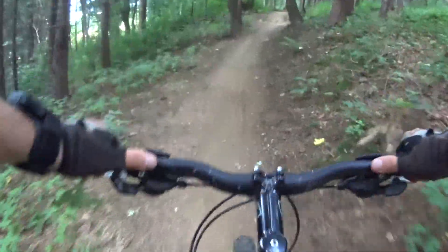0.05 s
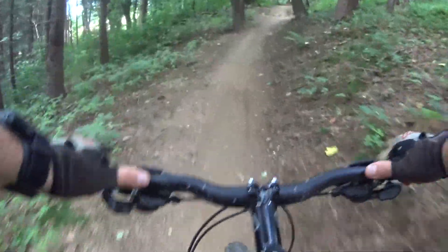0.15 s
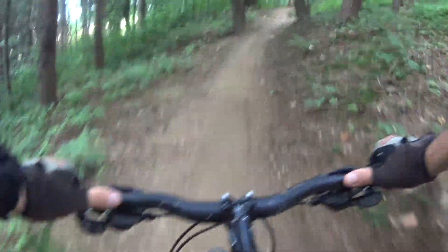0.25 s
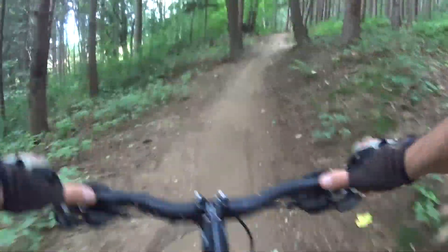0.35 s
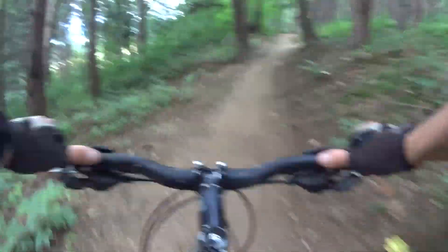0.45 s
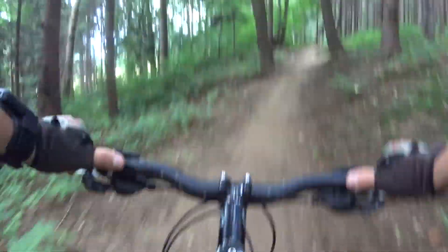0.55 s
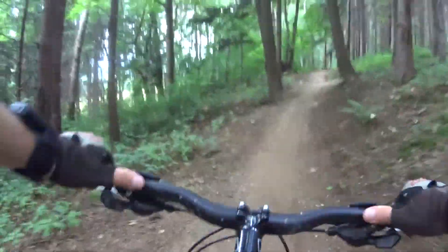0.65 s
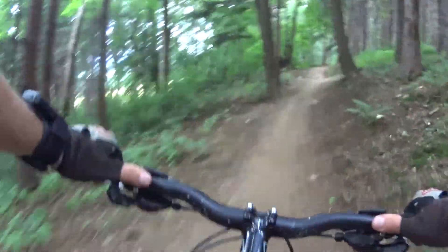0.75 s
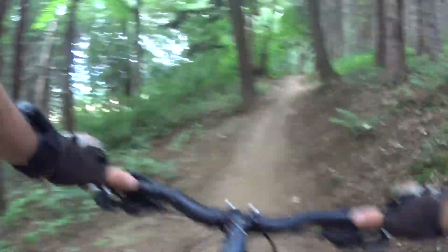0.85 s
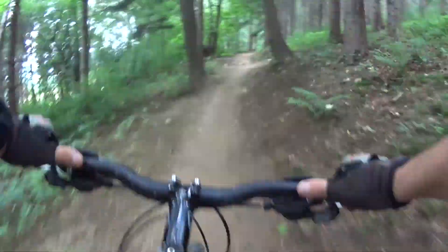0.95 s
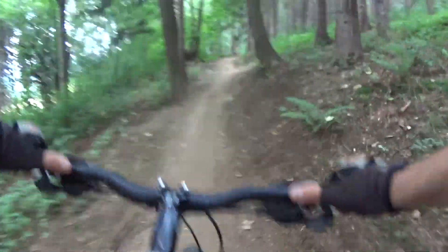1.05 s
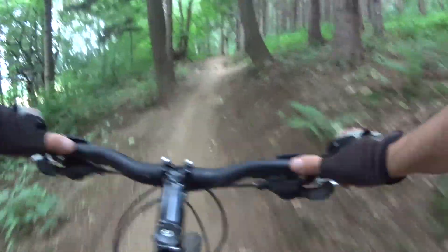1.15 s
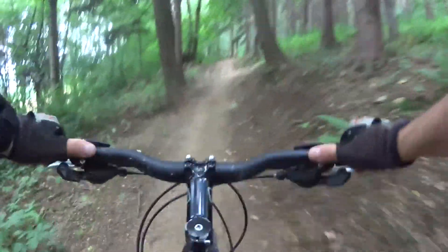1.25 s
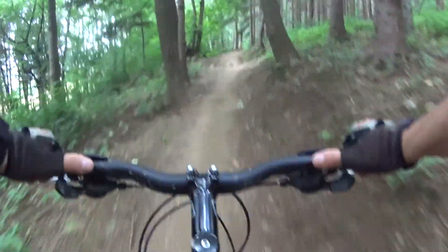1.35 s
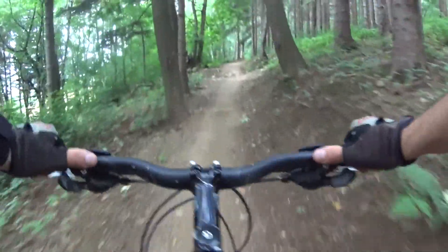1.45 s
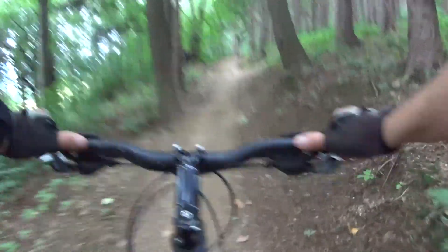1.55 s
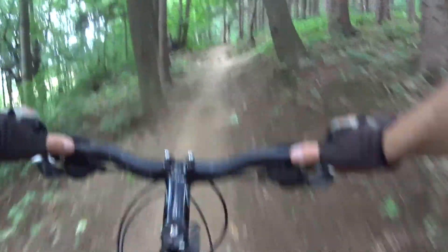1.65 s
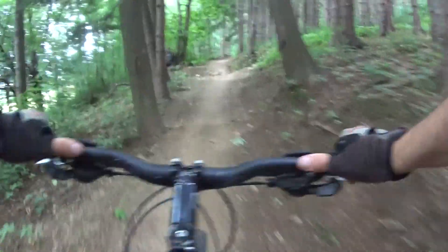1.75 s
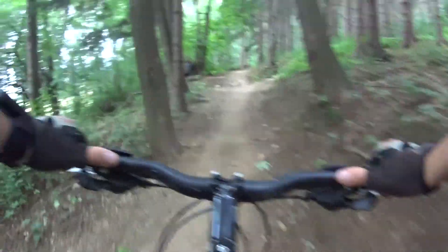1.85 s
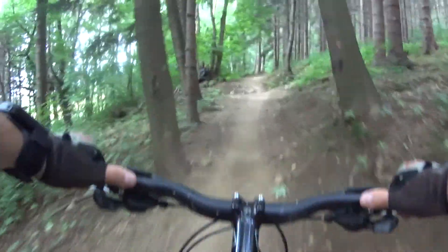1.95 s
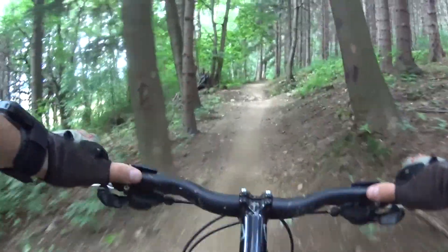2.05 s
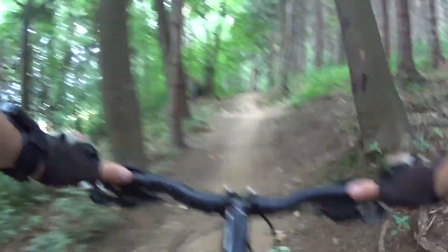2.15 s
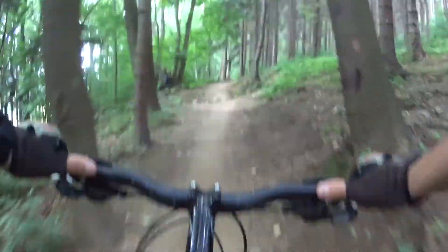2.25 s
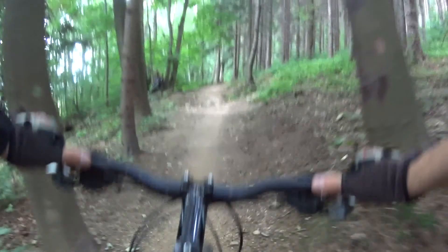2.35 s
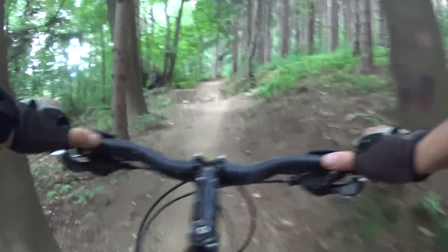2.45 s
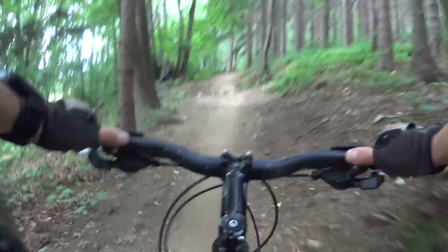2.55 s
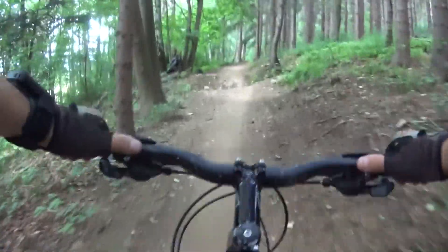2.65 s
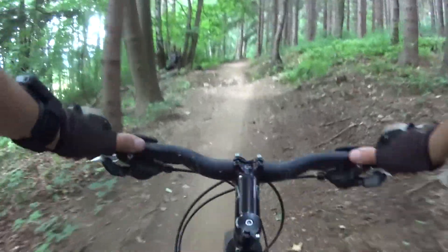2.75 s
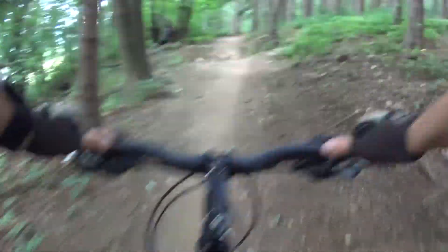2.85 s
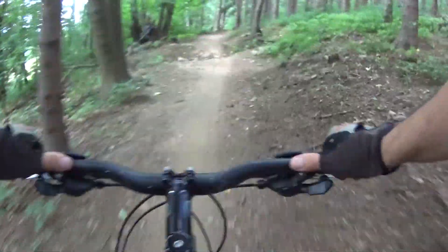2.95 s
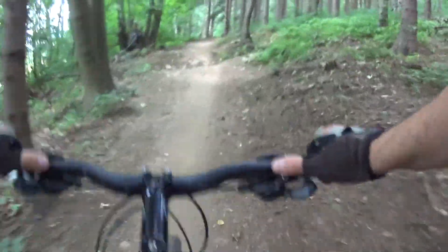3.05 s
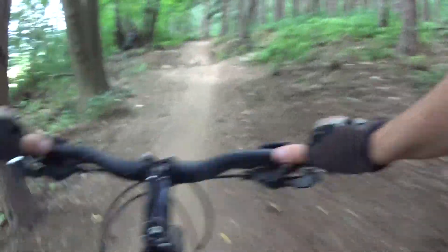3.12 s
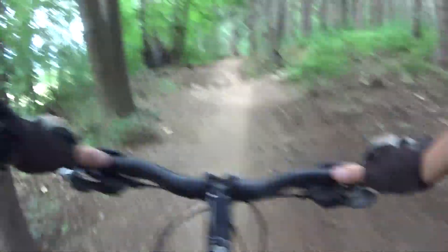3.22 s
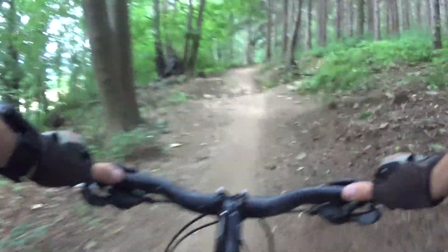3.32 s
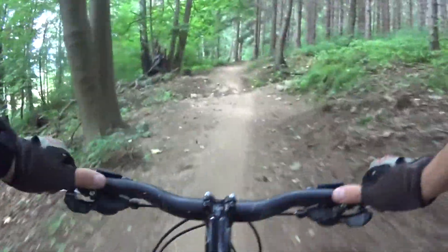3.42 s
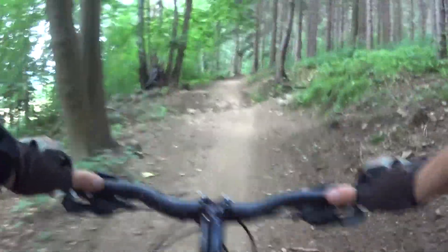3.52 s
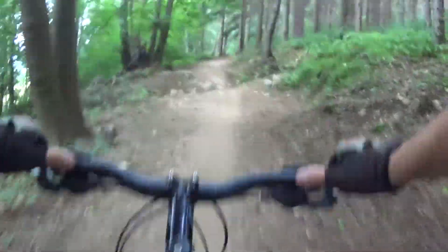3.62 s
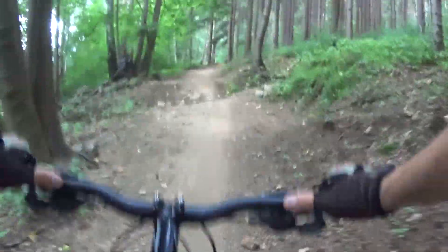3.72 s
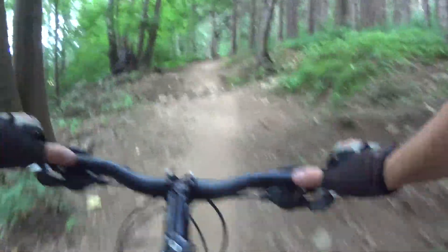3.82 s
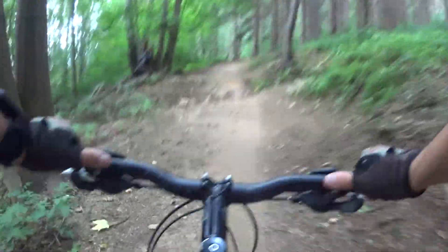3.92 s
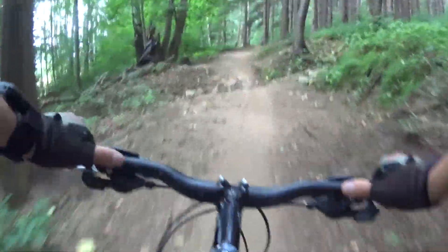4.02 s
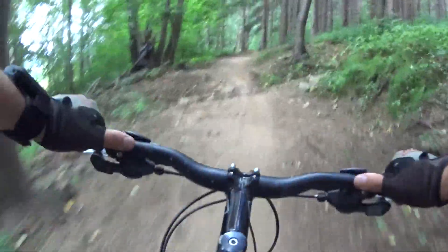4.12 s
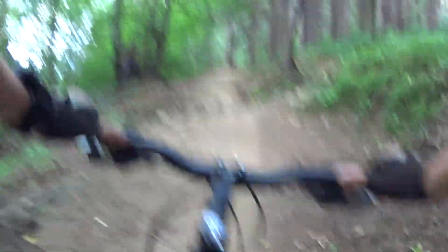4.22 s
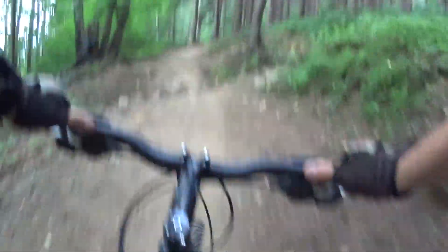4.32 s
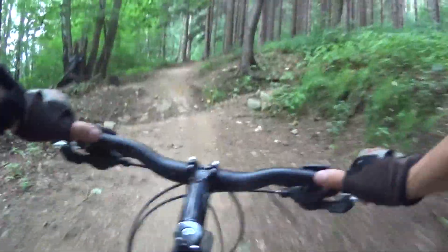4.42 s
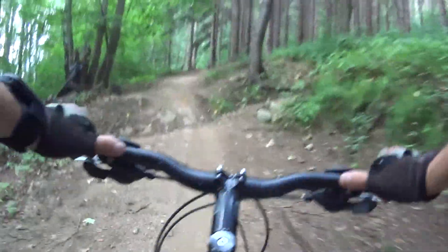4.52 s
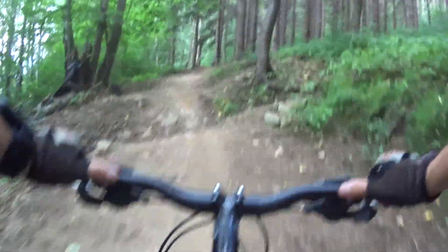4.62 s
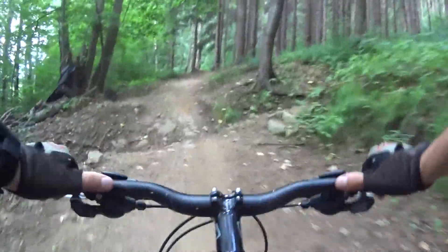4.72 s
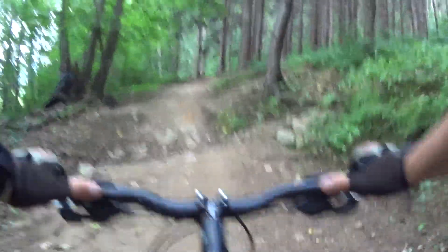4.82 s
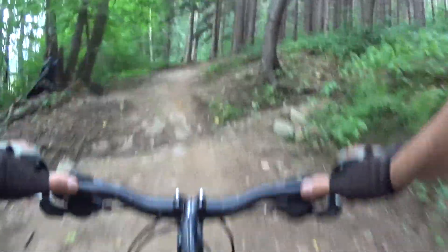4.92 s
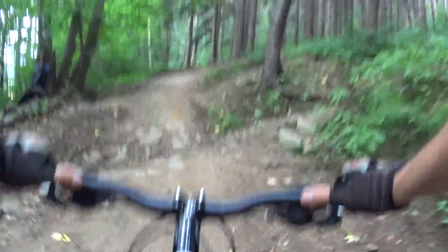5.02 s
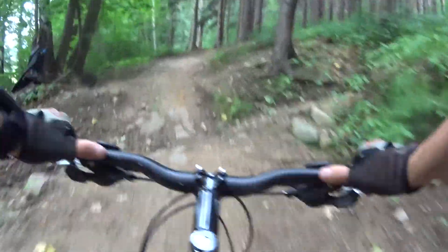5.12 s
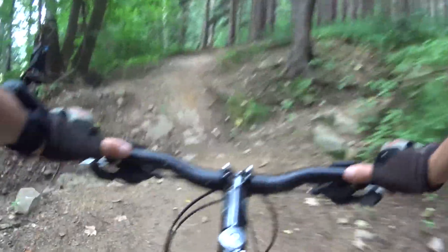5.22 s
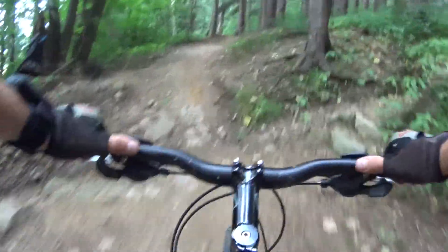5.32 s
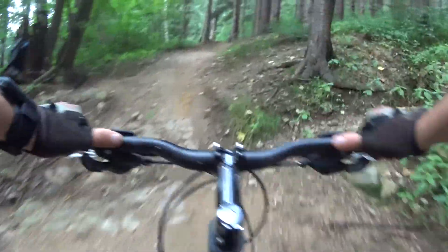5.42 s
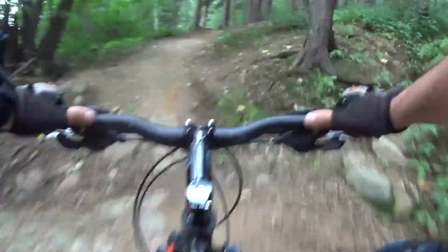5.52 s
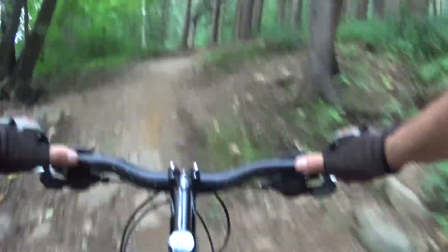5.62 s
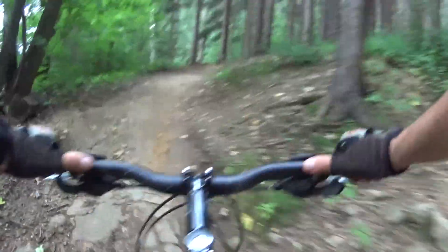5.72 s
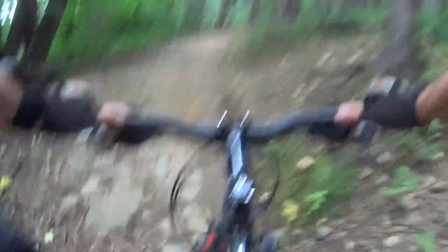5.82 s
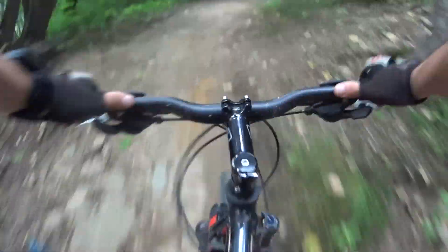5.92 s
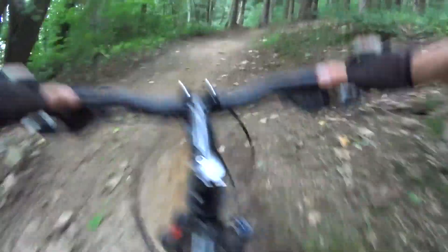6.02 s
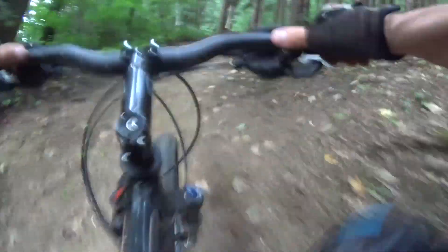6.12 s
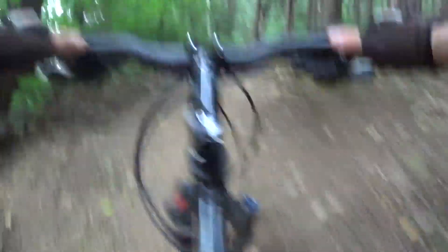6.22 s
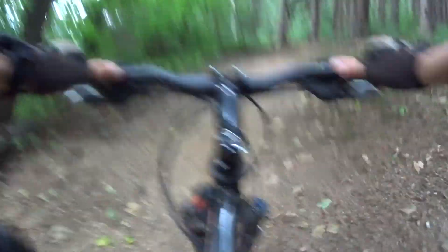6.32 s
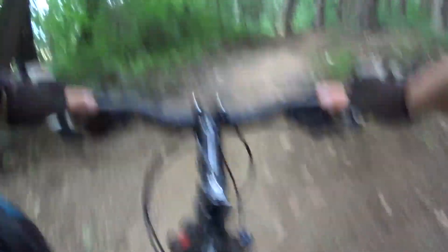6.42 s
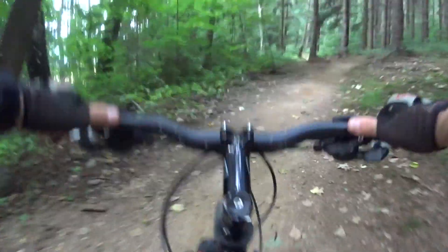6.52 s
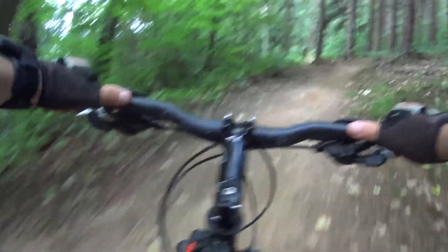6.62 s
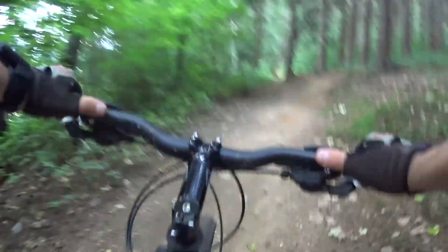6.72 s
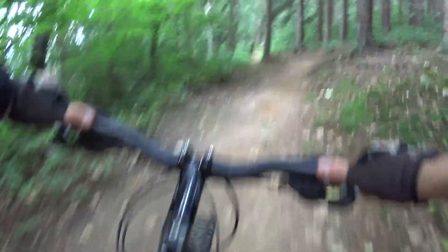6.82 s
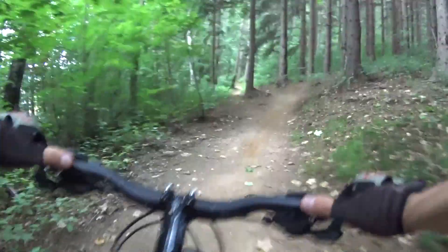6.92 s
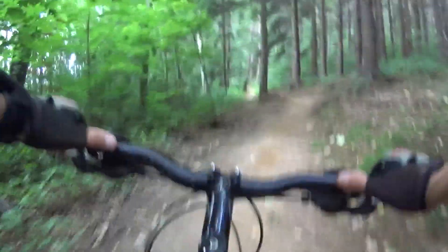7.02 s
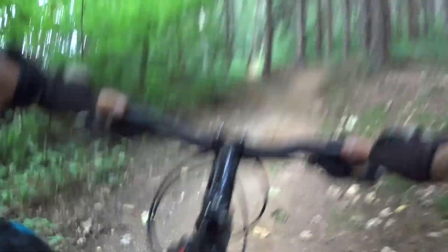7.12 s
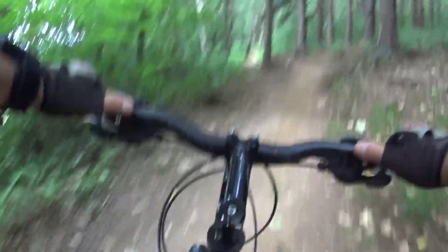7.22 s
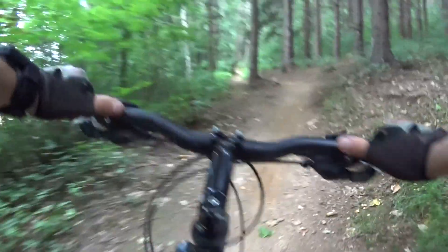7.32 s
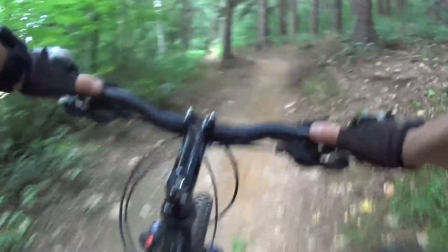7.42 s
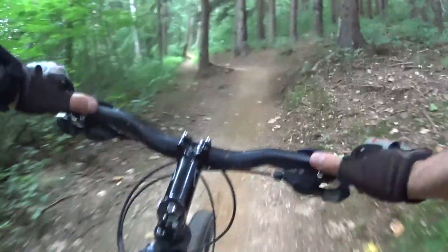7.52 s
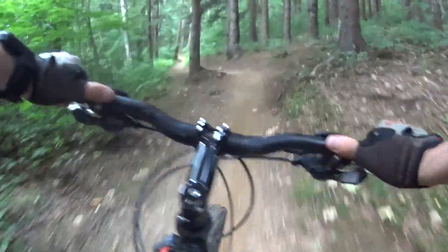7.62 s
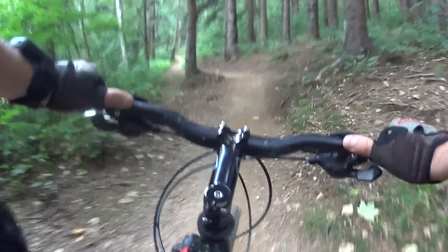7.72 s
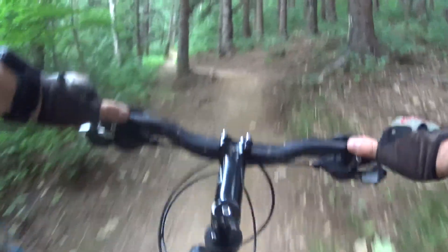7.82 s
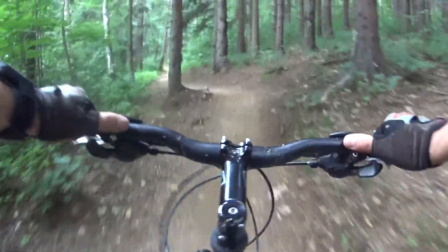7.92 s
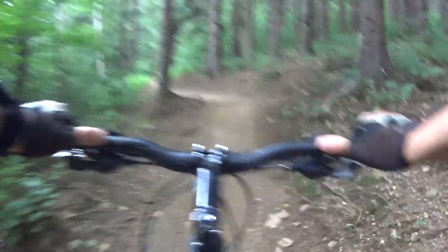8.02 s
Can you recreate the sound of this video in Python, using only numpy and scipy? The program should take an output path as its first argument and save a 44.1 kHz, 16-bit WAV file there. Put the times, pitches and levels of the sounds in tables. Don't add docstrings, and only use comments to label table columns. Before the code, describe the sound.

Close, boxy rattle of a bike on rough dirt: gritty tyre crackle, sharp frame slaps and case knocks, peaking in a hard clattering impact over rocks.

```python
import sys
import numpy as np
from scipy import signal
from scipy.fft import rfft, irfft, next_fast_len
from scipy.io import wavfile
from scipy.ndimage import uniform_filter1d, minimum_filter1d, map_coordinates

SR = 44100
rng = np.random.default_rng(int(sys.argv[2]) if len(sys.argv) > 2 else 0)


def attenuation_scalar(level_db):
    decades = np.asarray(level_db, float) / 20
    return 10 ** decades


def generate_wav(signal):
    frames = np.transpose(np.atleast_2d(signal))
    scaled = np.clip(frames, -1, 1) * 32767
    pcm = np.round(scaled).astype(np.int16)
    wavfile.write(sys.argv[1], SR, pcm)


N = 355446

# (frequency [Hz], density [dB per Hz])
GRIT_COLOUR = [(530, -41.5), (900, -9.5), (1160, -26), (1260, -3.5), (2020, 0), (2240, 2.5), (3640, -10.5),
               (6000, -19), (7800, -47), (13200, -120)]
# (frequency [Hz], density [dB per Hz])
HISS_COLOUR = [(1760, -39), (3000, 2.5), (3680, -3), (4700, 3.5), (6040, -4), (7540, -14.5), (8420, -9),
               (9890, -16), (10600, -10), (11300, -17), (14700, -60), (22000, -120)]
# (frequency [Hz], density [dB per Hz])
CASE_COLOUR = [(88, -28.5), (150, -1.5), (309, 5.5), (520, 8), (693, 7), (812, 5), (1230, 6.5), (1900, -4),
               (2470, -28), (4180, -120)]


def along(points, hz):
    f, v = np.transpose(points)
    return np.interp(np.log(hz + 1), np.log(f + 1), v)


def unit(x):
    return x / np.sqrt(np.mean(x ** 2) + 1e-20)


def wobble(rate):
    knots = rng.standard_normal(int(N * rate / SR) + 4)
    return map_coordinates(knots, [np.arange(N) * rate / SR])


def filtered(x, response):
    m = next_fast_len(N + 8192)
    return irfft(rfft(x, m) * response(np.fft.rfftfreq(m, 1 / SR)), m)[..., :N]


def causal(spectrum, hz):
    grid_hz = np.linspace(0, SR / 2, num=8193)
    cepstrum = irfft(np.log(attenuation_scalar(along(spectrum, grid_hz))))
    half = np.arange(len(cepstrum)) < len(grid_hz)
    return np.exp(np.interp(hz, grid_hz, rfft(cepstrum * half * 2) - cepstrum[0]))


def place(times_s, shapes):
    starts = np.round(times_s.ravel() * SR).astype(int)
    at = (starts[:, None] + np.arange(shapes.shape[2])).ravel()
    return np.array([np.bincount(at, shapes[:, c].ravel(), N + SR)[:N] for c in (0, 1)])


def grains(spectrum, per_s, clump_db, smooth):
    # (frequency [Hz], left-right likeness [0-1])
    likeness = [(60, 1), (220, 1), (600, 0.92), (1200, 0.79), (3160, .93), (11800, 0.57)]

    def stream():
        hits = rng.random(N) < per_s / SR * attenuation_scalar(clump_db * wobble(40))
        sizes = np.tanh(rng.standard_normal(N) ** 3 / 8)
        return unit(hits * sizes) + smooth * rng.standard_normal(N)

    def mid_side(hz):
        turn = np.arccos(np.clip(along(likeness, hz), -1, 1)) / 2
        return causal(spectrum, hz) * [np.cos(turn), np.sin(turn)]

    mid, side = filtered(np.array([stream(), stream()]), mid_side)
    return unit(np.array([mid + side, mid - side]))


def pebbles(bumps, count):
    luck = rng.random((4, count, 1, 1))
    odds = np.cumsum(attenuation_scalar(2.5 * bumps))
    s = np.searchsorted(odds, luck[0].ravel() * odds[-1]) / SR
    hz = 2350 * np.exp(0.292 * rng.standard_normal((count, 1, 1)))
    t = np.arange(SR // 160) / SR
    t60_s = 0.003 + 0.015 * luck[2]
    size = attenuation_scalar(-4.5 * np.log(luck[1] + 0.028) - 60 * t / t60_s)
    spread_rad = 1.7 * (luck[3] - 0.5) * [[1], [-1]]
    return unit(place(s, size * np.sin(2 * np.pi * hz * t + spread_rad)))


def rolling():
    # (time [s], loose dirt under the tyres [dB], bumpiness of the ground [dB])
    ride = [(0.0, -36, -51), (0.13, -32, -53), (0.27, -27.5, -39.5), (0.69, -37, -46), (1.48, -32.5, -39.5),
            (1.91, -31.5, -49), (2.11, -35, -46), (2.99, -36, -41), (3.21, -39.5, -40),
            (4.29, -35.5, -43.5), (4.76, -36, -44.5), (5.25, -32, -50.5), (5.75, -28, -44),
            (5.88, -21.5, -22.5), (6.33, -33.5, -29), (6.62, -33, -37), (7.52, -34.5, -44.5),
            (8.06, -31.5, -43.5)]
    # (frequency [Hz], density [dB per Hz])
    buffet_colour = [(8.8, -55), (15, 7.5), (133, 0), (216, -6.5), (400, -7.5), (520, -81), (880, -120)]
    s, *cols = np.transpose(ride)
    loose_db, bumpy_db = (np.interp(np.arange(N) / SR, s, c) for c in cols)
    grit_db = loose_db - 2.5
    hiss_db = -39 + 0.76 * (loose_db - loose_db.mean())
    swing_db = bumpy_db - bumpy_db.mean()
    buffet_db, shake_db = -39 + 0.6 * swing_db, -41 + 0.74 * swing_db

    bumps = wobble(22)
    grit = attenuation_scalar(grit_db + 2.5 + 0.6 * bumps) * grains(GRIT_COLOUR, per_s=800, clump_db=4, smooth=0.6)
    stones = attenuation_scalar(grit_db - 4.0) * pebbles(bumps, count=2200)
    hiss_gain = attenuation_scalar(hiss_db + 1.4 * bumps + 0.28 * wobble(29))
    hiss = hiss_gain * grains(HISS_COLOUR, per_s=890, clump_db=8.5, smooth=1.0)
    gusts = attenuation_scalar(2.5 * wobble(18))
    buffet = attenuation_scalar(buffet_db + 1.0) * gusts * grains(buffet_colour, per_s=190, clump_db=3, smooth=0.8)
    lumps = attenuation_scalar(2.6 * wobble(35))
    shake = lumps * attenuation_scalar(shake_db) * grains(CASE_COLOUR, per_s=350, clump_db=4.5, smooth=1.0)
    return grit + stones + hiss + buffet + shake


def slaps(rows):
    s, db, hz, bright_db = np.transpose(rows)[:, :, None, None]
    t = np.arange(SR // 30) / SR
    luck = rng.random((len(s), 4, 1))

    def ping(u):
        envelope = (u > 0) * attenuation_scalar(-60 * u / 0.0044) * (1 - np.exp(-np.abs(u) / 0.00035))
        return envelope * np.sin(2 * np.pi * hz * u + 0.8 * luck[:, :2])

    bounce_s = 0.0015 + 0.00334 * luck[:, 3:]
    ring = ping(t) + attenuation_scalar(-13.0 - 6.0 * luck[:, 2:3]) * ping(t - bounce_s)
    shared = rng.standard_normal((len(s), 1, len(t)))
    noise = shared + 0.5 * rng.standard_normal((len(s), 2, len(t)))
    tail = place(s, attenuation_scalar(db + 1 - 60 * t / 0.028) * noise)
    tick_decay = attenuation_scalar(8 - 60 * t / 0.005) + attenuation_scalar(-60 * t / 0.05)
    tick = place(s, attenuation_scalar(db + bright_db + 6.5) * tick_decay * noise)
    gritty = filtered(tail, lambda f: attenuation_scalar(along(GRIT_COLOUR, f)))
    bright = filtered(tick, lambda f: attenuation_scalar(0.82 * along(HISS_COLOUR, f)) * (f > 3500))
    return place(s, attenuation_scalar(db + 6.5) * ring) + gritty + bright


def chain():
    # (time [s], peak [dB], ring [Hz])
    chain_slaps = [(.036, -6.5, 1800), (0.126, -8, 2570), (0.135, -11, 2460), (0.2082, -6, 2800),
                   (1.0114, -5.5, 2380), (1.6099, -14, 2520), (1.6933, -3, 2200), (1.8075, -4.5, 2840),
                   (1.971, -11, 2400), (2.093, -3, 2130), (2.3432, -4.5, 2400), (2.3844, -7, 3540),
                   (2.7178, -12.5, 3440), (2.813, -7, 2240), (3.768, -14, 3970), (3.843, -11.5, 3170),
                   (4.1, -7, 2100), (4.124, -7, 2200), (4.135, -10, 2970), (4.4915, -5, 2450),
                   (4.6507, -10, 2480), (4.738, -12, 2270), (5.349, -1.5, 2980), (5.5037, -3.5, 2140),
                   (5.5982, -2.5, 2410), (5.959, 3.5, 1910), (6.137, 1.5, 1940), (6.3925, -9, 2080),
                   (7.202, -1, 2130)]
    # (time [s], peak [dB])
    chain_ticks = [(0.0512, -12), (0.261, -9), (.277, -13), (.419, -6), (0.224, -2), (0.9147, -13.5),
                   (1.963, -12), (2.6226, -15.5), (2.7954, -9), (2.867, -15.5), (3.112, -8), (3.13, -22),
                   (4.297, -19), (4.3714, -13), (4.474, -14), (4.5267, -16), (4.721, -15), (4.9577, -11),
                   (5.125, -14), (5.187, -18), (5.4248, -11), (5.66, -24), (6.8503, -16)]
    bright_db, tick_hz = -27, 2450
    rows = [(*r, bright_db) for r in chain_slaps]
    return slaps(rows + [(*r, tick_hz, bright_db) for r in chain_ticks])


def cables():
    # (time [s], peak [dB], ring [Hz])
    cable_slaps = [(0.1712, -5.5, 2680), (0.248, -8, 2130), (0.289, -5, 2310), (0.315, -6, 2400),
                   (0.341, -6.5, 2310), (0.359, -8, 2260), (0.394, -13, 2250), (.406, 0, 2100),
                   (0.4448, -4, 2400), (1.427, -9, 2430), (1.4378, -4, 2460), (1.4768, -12, 2780),
                   (1.485, -7, 1870), (3.489, -14.5, 2100), (3.653, -9, 1980), (3.698, -12, 2000),
                   (3.679, -2.5, 2000), (4.7676, -1, 2620), (5.098, 0.5, 2480), (5.6436, -4, 2880),
                   (5.8748, -4, 2580), (5.921, -2, 2200), (7.034, -8, 2270), (7.1102, -9, 2000),
                   (7.595, 0, 2410), (7.6874, -3, 2600), (7.823, -7, 2080), (7.835, -2, 1950),
                   (8.052, -5, 1890)]
    bright_db = -34
    return slaps([(*r, bright_db) for r in cable_slaps])


def jolts():
    # (time [s], peak [dB], push [Hz], negative = pull)
    pushes = [(0.339, -17, 197), (0.416, -17, -143), (0.6154, -33, -208), (0.765, -18, -130),
              (0.865, -10, -162), (0.943, -16, -122), (1.5049, -15, 182), (1.5194, -25, 195),
              (1.829, -19, -165), (1.878, -22.5, 313), (2.143, -27.5, -174), (2.793, -15.5, 61),
              (2.8486, -4, 196), (3.2012, -21, 153), (5.957, -2, 121), (6.038, -12, 145), (6.0499, 0, 186),
              (6.055, -5, 220), (6.0693, -0.5, -182), (6.1179, -10, 196), (6.192, -17, -165),
              (6.229, -14, 174), (6.2662, -0.5, 220), (6.664, -21, -65), (6.908, -15, 208),
              (6.914, -7.5, 198), (6.3635, -4, 300), (6.339, -12, -200), (6.309, -25, -200),
              (6.112, -13, 192)]
    s, db, hz = np.transpose(pushes)[:, :, None, None]
    u = np.arange(SR // 15) / SR * hz
    push = np.sin(2 * np.pi * u) * np.exp(-1.5 * u ** 2)
    return place(s, attenuation_scalar(db + 1.0) * push * np.ones((1, 2, 1)))


def case_blows(rows):
    # (frequency [Hz], level [dB], t60 [s])
    low_modes = [(172, -2, 0.065), (318, -5, 0.045), (420, -5, 0.045), (520, -5, 0.04), (695, -3.5, 0.06),
                 (825, -13, 0.04)]
    # (frequency [Hz], level [dB], t60 [s])
    high_modes = [(1050, -7, 0.03), (1222, 4, 0.075), (1360, 2.5, 0.06), (1500, -2, 0.04), (1657, -3, 0.03),
                  (2100, -14, 0.013)]
    contact_s, low_lead_s = 0.00275, 0.00045
    contact_hz, sweep_rad_per_khz2 = 1350, 5.1
    grip_s = 0.016
    clean_db = -8

    s, db, low_db, chatter_s = np.transpose(rows)[:, :, None, None]
    t = np.arange(SR // 16) / SR
    strap = np.exp(-(t / grip_s) ** 2)
    ring = 0
    for modes, gain_db, lead_s, sweep, grip in (
            (low_modes, low_db + 0.5, low_lead_s, 0, 1), (high_modes, -3, 0, sweep_rad_per_khz2, strap)):
        for hz, level_db, t60_s in modes:
            luck = rng.standard_normal((len(s), 6, 1))
            phase = 2 * np.pi * hz * (1 + 0.006 * luck[:, :1]) * (t - contact_s + lead_s)
            phase = phase + sweep * ((hz - contact_hz) / 1000) ** 2
            phase = phase + 0.3 * luck[:, 5:] + 0.2 * luck[:, 1:3]
            strength_db = gain_db + level_db + 2.1 * luck[:, 5:] + 0.95 * luck[:, 3:5]
            ring = ring + attenuation_scalar(strength_db - 60 * t / t60_s) * np.cos(phase) * grip

    luck = rng.random((len(s), 2, len(t)))
    chatter = (luck[:, :1] < 600 / SR) * (t < chatter_s) * (1.73 * luck[:, 1:] - 0.9)
    soft = 1 - np.exp(-(t / 0.0013) ** 2)
    burst = signal.fftconvolve((t == 0) + chatter, ring * soft, axes=2)
    peak = np.abs(burst).max((1, 2), keepdims=True)

    thud_db = db + 7.5 + clean_db * (chatter_s < 0.001) - 60 * np.maximum(t - chatter_s, 0) / 0.042
    puff = attenuation_scalar(thud_db) * soft * rng.standard_normal((len(s), 1, len(t))) * np.ones((2, 1))
    thud = filtered(place(s, puff), lambda f: causal(CASE_COLOUR, f))
    return thud + place(s, attenuation_scalar(db + 9.0) * burst / peak)


def knocks():
    # (time [s], peak [dB], low modes [dB])
    open_knocks = [(0.575, -20.5, -5), (0.6123, -14, 9), (1.0292, -19, 10), (1.0367, -9, -12),
                   (1.3071, -14.5, -3.5), (1.7219, -9.5, -2), (2.1325, -9.5, 3), (2.634, -5.5, -6),
                   (2.8, -16, 5), (2.8073, -14.5, -4), (2.8113, -15, -4), (3.0406, -7.5, -10),
                   (3.3798, -8.5, -6), (3.506, -6, 0.5), (3.63, -8.5, -18), (3.6519, -18, -30),
                   (3.6759, -7.5, -16), (3.68, -9, 0), (3.6957, -6, -6.5), (3.886, -22.5, -2),
                   (4.0268, -7, -6.5), (4.345, -7, -8.5), (4.447, -8, -4.5), (4.9763, -5, -8),
                   (5.317, -6.5, -5), (6.9307, -5, -3.5), (7.061, -7.5, -10), (7.2374, -6.5, -8.5),
                   (7.5115, -5.5, -5.5), (7.738, -22.5, -10), (7.863, -11.5, -0.5), (8.0516, -16, -4)]
    # (time [s], peak [dB], low modes [dB])
    rock_knocks = [(5.5029, -21, 0), (5.5206, -23, -14), (5.6897, -9, -2.5), (5.71, -22, -4),
                   (5.718, -21, -1), (5.729, -26.5, -2), (5.746, -22, 2), (5.7617, -11.5, -14),
                   (5.782, -21, -7), (5.803, -16, -3), (5.8387, -15.5, 2), (5.845, -15, -2),
                   (5.863, -21, 0), (5.877, -12, 7), (5.884, -10, -2), (5.891, -14, -22), (5.8958, -10, 8),
                   (5.9125, -10.5, 2), (5.9588, -20, 4), (5.993, -39, -6), (6.046, -15, 5),
                   (6.0555, -16, -1), (6.068, -10, 5), (6.0812, -11.5, -20), (6.089, -26, -14),
                   (6.127, -23, -20), (6.13, -16, -23), (6.1364, -20, -13), (6.1594, -13, -1),
                   (6.2328, -7.5, -1), (6.264, -12, -2), (6.2723, -12, -5), (6.28, -16, -9),
                   (6.287, -16, -20), (6.352, -21, -1), (6.4109, -6, -23), (6.414, -11, -28),
                   (6.4516, -15, -18), (6.486, -29, -12), (6.493, -19, -11), (6.498, -16, 1),
                   (6.505, -17.5, 4), (6.511, -20, -1), (6.517, -27, 2), (6.5491, -29.5, -2),
                   (7.002, -23.5, 1), (3.2, -27.5, -3), (3.223, -28.5, 2), (3.258, -34, 16),
                   (2.994, -28, 10), (4.183, -27.5, 11), (2.5745, -26, -9), (2.7865, -26, -13),
                   (2.8252, -22, -10), (3.602, -30, 4), (0.99, -29, -20), (.872, -30, -14),
                   (.89, -32.5, -10), (0.923, -31, -6), (1.256, -39, 4)]
    # (time [s], peak [dB], low modes [dB], chatter
    # [s])
    own_chatter = [(0.7613, -10.5, 22, 0.002), (0.855, -31, 12, 0.026), (1.488, -29, 5, 0.063),
                   (2.307, -7, -7.5, 0.0015), (2.905, -7, -4, 0.0013), (4.2567, -27.5, -1, 0.0048),
                   (4.7971, -12.5, -6, 0), (4.803, -13.5, -3, 0.00054), (6.8582, -16, -20, 0.0029),
                   (6.862, -11, -25, 0.0064), (6.8665, -9, -20, 0), (6.871, -12.5, -13, 0.0033),
                   (4.169, -33.5, 10, 0.052), (0.661, -38, 26, 0.022), (1.34, -37.5, 10, 0.088),
                   (0.941, -39, 12, 0.026), (2.856, -35, 14, 0.01), (5.4, -33, 3, .09)]
    rock_chatter_s = 0.0022
    rows = [(*r, 0) for r in open_knocks] + [(*r, rock_chatter_s) for r in rock_knocks]
    return case_blows(rows + own_chatter)


def cracks():
    # (time [s], peak [dB], ring [Hz])
    cracked = [(.649, -22, 2190), (0.6603, -25, 2100), (.694, -23.5, 2230), (.841, -22, 2400),
               (1.102, -26, 2060), (1.214, -16, 2320), (1.241, -16, 1760), (1.322, -20, 2150),
               (1.356, -25, 2990), (1.45, -13, 2330), (1.6485, -11, 2450), (1.856, -30, 2650),
               (1.919, -28, 2360), (2.251, -28, 2460), (2.4356, -17, 2300), (2.514, -14, 2600),
               (2.576, -13, 5540), (2.594, -19, 2500), (2.667, -38, 2400), (2.8335, -17.5, 2080),
               (2.955, -27, 2520), (3.0714, -21.5, 2290), (3.1672, -16, 2090), (3.765, -18, 2100),
               (3.97, -26, 2240), (4.0192, -15.5, 1920), (4.071, -19, 2330), (4.215, -21, 1890),
               (4.633, -20, 2300), (4.679, -18, 4300), (4.86, -21, 2100), (4.9004, -23, 3000),
               (4.943, -18.5, 2300), (5.2415, -31, 2190), (5.266, -15, 3500), (5.29, -14, 2500),
               (5.301, -9, 2000), (5.415, -16, 4200), (5.4625, -22, 2760), (5.482, -23, 2220),
               (5.5588, -25, 2300), (5.9943, -29, 2300), (6.019, -17, 2170), (6.041, -12, 2280),
               (6.1283, -10, 2020), (6.5046, -14, 2120), (6.543, -9, 2700), (6.585, -16, 2420),
               (6.6377, -20, 2070), (6.6907, -20, 2320), (6.7254, -22, 2410), (6.8365, -24.5, 2260),
               (7.026, -20, 1900), (7.0773, -19, 2410), (7.185, -21, 2220), (7.462, -14, 2080),
               (7.592, -20, 2350), (7.573, -22, 5400), (7.777, -18, 4900), (7.908, -11.5, 2320)]
    bright_db = -20
    return slaps([(*r, bright_db) for r in cracked])


def thrown_stones():
    # (time [s], peak [dB], ring [Hz], brightness [dB])
    thrown = [(0.7497, -20, 2330, -16), (1.1465, -36, 2130, 5), (1.7164, 1, 2200, -25.5),
              (1.7725, -15, 2090, -21), (2.1807, -24, 4200, -12), (2.443, -18, 4270, -12),
              (2.476, -14.5, 5200, -9), (2.53, -20, 4300, -15), (3.0264, -18.5, 2420, -23),
              (3.444, -16.5, 2200, -18), (3.681, -8, 4700, -44), (3.886, -14.5, 3440, -17.5),
              (3.9938, -25, 5300, -5), (3.993, -28, 9100, 17), (4.39, -7.5, 1930, -20.5),
              (4.83, -16.5, 3100, -19), (5.001, -16, 2350, -20), (5.312, -11, 2880, -23),
              (5.8205, -3, 2500, -20), (5.819, -5, 4320, -22), (5.806, -14, 3200, -11),
              (6.252, -11, 5240, -12.5), (5.8554, -26, 2310, 0), (6.1, -12, 2450, -12),
              (6.1857, -17, 2240, -14), (6.238, -2.5, 2540, -16), (6.283, -12.5, 2700, -17),
              (6.339, -14, 2060, -16), (6.603, -29, 3140, 2), (6.606, -23.5, 8900, -3),
              (6.651, -29.5, 5000, -6), (1.353, -30.5, 8600, 0.5), (7.89, -26, 5500, -5),
              (7.296, -14, 2520, -24), (7.442, -13, 2820, -31), (7.4797, -15, 2900, -24),
              (7.9197, -16, 2340, -30)]
    return slaps(thrown)


def drumming():
    start_s, gap_s, first_db, rise_db = 6.3112, 0.0272, -8.5, 1
    low_db, chatter_s = -17, 0.0015
    ping_hz, clack_hz, clip_db, bright_db = 4700, 2200, -4.5, -34
    roll = [(start_s + k * gap_s, first_db + k * rise_db) for k in range(6)]
    clips = [(s, db + clip_db, hz, bright_db) for s, db in roll for hz in (ping_hz, clack_hz)]
    return case_blows([(*blow, low_db, chatter_s) for blow in roll]) + slaps(clips)


def scene():
    # (frequency [Hz], left-right level [dB])
    port_db = [(30, -3), (60, -5), (150, -7), (300, -6), (600, -2), (900, -5), (1430, -4), (1900, 2),
               (2500, -0.5), (11800, 0)]
    # (frequency [Hz], left lead [rad])
    port_lead = [(30, -0.6), (550, -0.55), (850, -1.5), (1050, -0.5), (1650, -0.1), (2000, .8),
                 (2350, -0.6), (3800, 0)]

    def ports(hz):
        half = attenuation_scalar(along(port_db, hz) / 2) * np.exp(0.5j * along(port_lead, hz))
        return np.array([half, 1 / half])

    bike = rolling() + chain() + cables() + cracks() + thrown_stones()
    return filtered(bike + jolts() + knocks() + drumming(), ports)


def low_pass(x):
    return signal.sosfilt(signal.butter(12, 12430, fs=SR, output="sos"), x)


def record(dry):
    top_hz, recover_s = 11150, 0.007
    peak_db = 20 * np.log10(np.abs(dry).max(0) + 1e-9)
    need_db = -0.42 * np.maximum(peak_db + 13, 0)
    held_db = minimum_filter1d(need_db, size=461, origin=80)
    keep = np.exp(-1 / (recover_s * SR))
    recovery_db = signal.lfilter([1 - keep], [1, -keep], held_db)
    gain_db = np.minimum(uniform_filter1d(held_db, size=91), recovery_db)
    level = dry * attenuation_scalar(gain_db)
    clipped = level / (1 + np.abs(level / 0.85) ** 4) ** 0.25
    mix = filtered(clipped, lambda hz: 1 / (1 + (hz / top_hz) ** 150) + 0.02)
    return low_pass(mix)


dry = scene()
out = record(dry)
generate_wav(out)
```